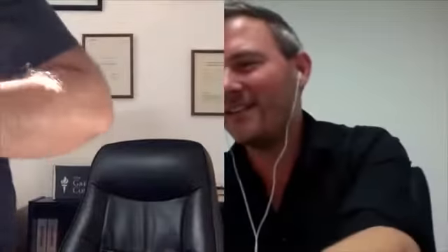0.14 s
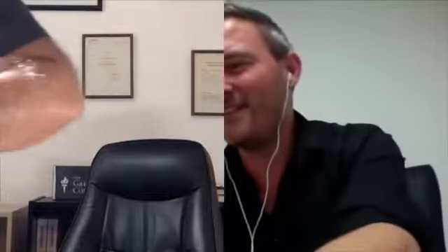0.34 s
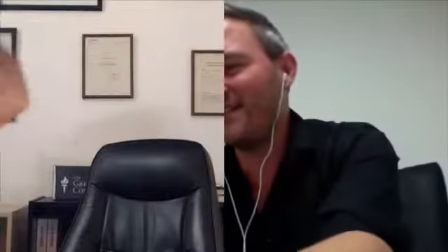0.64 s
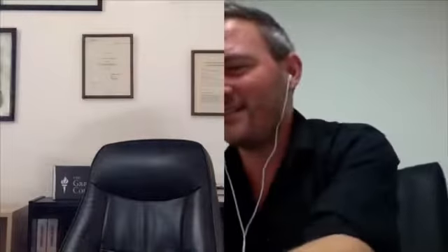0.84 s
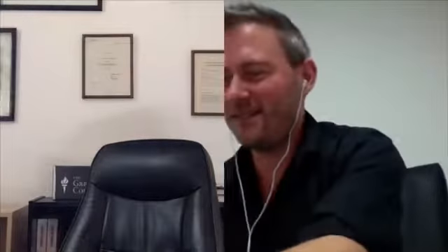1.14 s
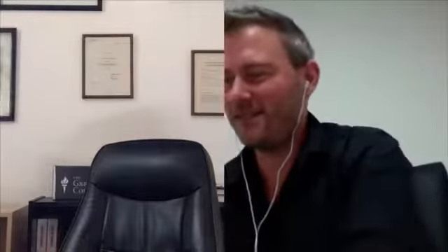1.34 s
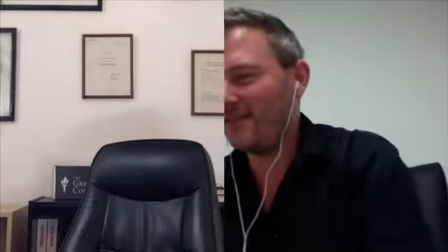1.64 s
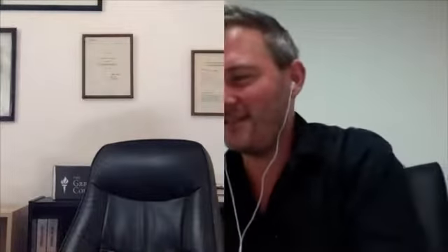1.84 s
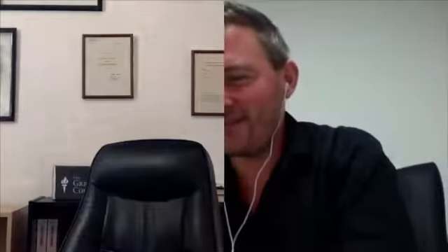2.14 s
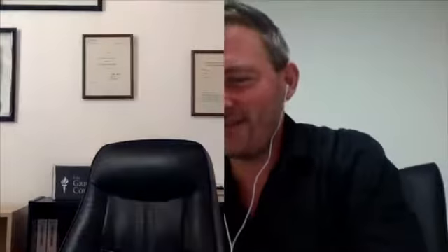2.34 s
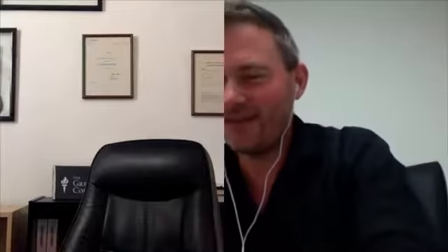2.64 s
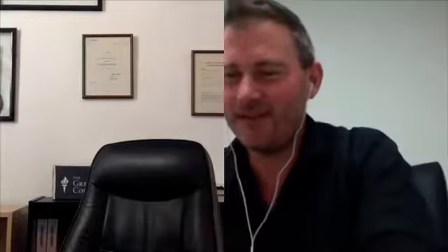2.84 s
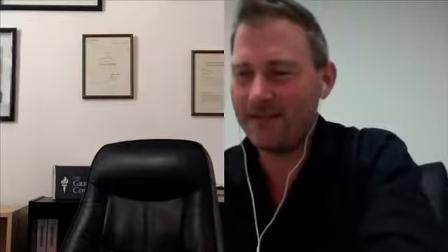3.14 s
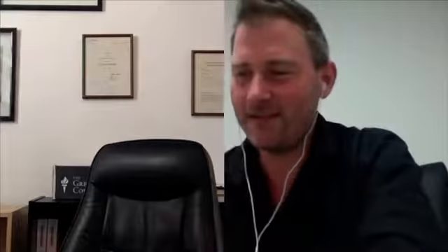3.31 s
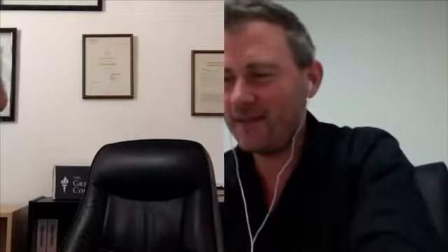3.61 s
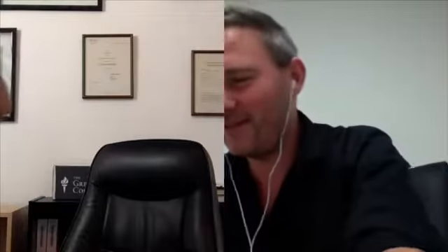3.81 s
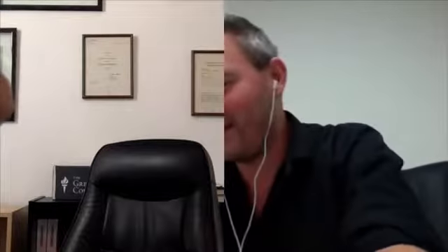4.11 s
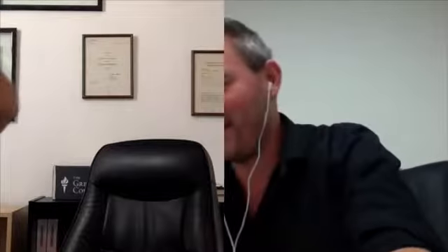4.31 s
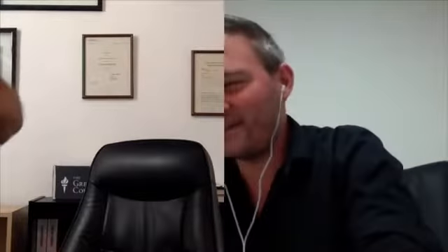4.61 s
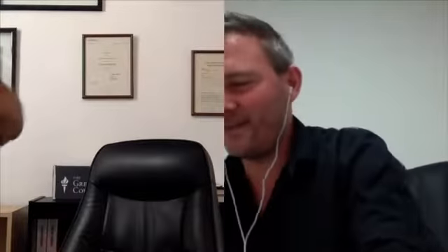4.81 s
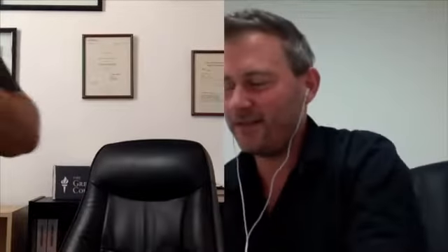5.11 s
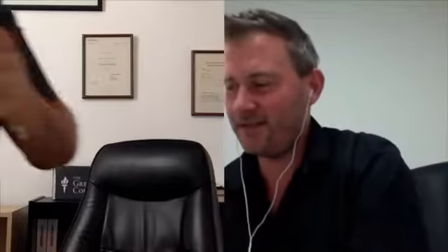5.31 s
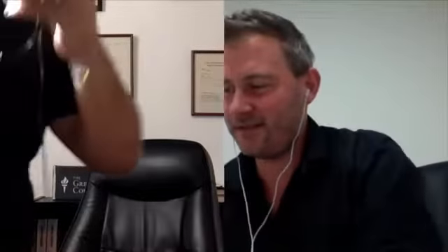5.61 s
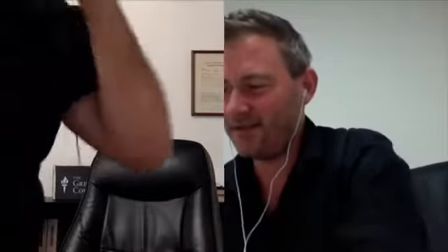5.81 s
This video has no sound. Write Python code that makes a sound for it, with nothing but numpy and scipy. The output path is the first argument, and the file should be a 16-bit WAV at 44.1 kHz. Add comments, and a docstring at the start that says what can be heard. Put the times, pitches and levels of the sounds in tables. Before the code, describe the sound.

Thin blind slats knock, scrape and snap close by while cords hiss and the rail bumps dully. A first burst peaks near one second; single clacks and a ringing snap follow with pauses between; then a busier, longer rattle fills the time around four to five seconds before small ticks close. Small room, faint low hum, thin bass and suppressed tails of a video-call microphone.

```python
"""A window blind is worked in bursts in a small office: its thin slats rustle, rattle and snap, made by
resonances that are rubbed with noise or struck with blows. Sliding cords hiss as shaped noise, the bottom rail
thuds on the sill as a low resonance, and scrapes squeak as gliding resonances. Sharp snaps leave a shimmer in
the head rail. The room adds a decaying tail; a faint hum and room air stay underneath."""
import sys
import numpy as np
from scipy import signal
from scipy.fft import rfft, irfft, next_fast_len
from scipy.io import wavfile
from scipy.ndimage import uniform_filter1d, map_coordinates

SR = 44100
rng = np.random.default_rng(int(sys.argv[2]) if len(sys.argv) > 2 else 0)


def bounce(signal):
    """Save signal as a 16-bit WAV file at the path given by the first command-line argument."""
    frames = np.transpose(np.atleast_2d(signal))
    limited = np.clip(frames, -1, 1)
    pcm = np.round(limited * 32767).astype(np.int16)
    wavfile.write(sys.argv[1], SR, pcm)


def level_to_linear(level):
    """Convert decibel levels to linear amplitude factors, elementwise."""
    exponent = np.asarray(level, float) / 20
    return 10 ** exponent


N = 262878

# Resonances of the rail and of a slat's dull knock, clack and bright snap.
# Each row: centre in Hz, nominal width in Hz before broadening, level in dB before tilt and scatter.
RAIL_MODES = [(2600, 170, -5), (2960, 130, 0), (3450, 300, -20)]
KNOCK_MODES = [(520, 170, -5), (770, 170, 0), (980, 220, -2)]
CLACK_MODES = [(1400, 220, -3), (1800, 200, 0), (2200, 280, -3)]
SNAP_MODES = [(4600, 1100, -3), (5800, 1000, 2), (8500, 3000, -4), (14000, 4000, -7)]


def unit(x):
    """Normalisation of power: scales a signal to rms 1."""
    return x / np.sqrt(np.mean(x ** 2) + 1e-20)


def along(points, hz):
    """Logarithmic frequency scale: interpolates (Hz, value) points on it."""
    f, v = np.transpose(points)
    return np.interp(np.log(hz + 1), np.log(f + 1), v)


def curves(rows):
    """Linear interpolation in time: one value per sample for each column after the time."""
    s, *cols = np.transpose(rows)
    return [np.interp(np.arange(N) / SR, s, c) for c in cols]


def wobble(rate):
    """Slow random modulation: a smooth curve through random knots, rate knots a second."""
    knots = rng.standard_normal(int(N * 400 / SR) + 4)
    return map_coordinates(knots, [np.arange(N) * rate / SR])


def filtered(x, response):
    """Linear filtering: the spectrum of x times a complex response of frequency."""
    m = next_fast_len(len(x) + 8192)
    return irfft(rfft(x, m) * response(np.fft.rfftfreq(m, 1 / SR)), m)[:len(x)]


def modes(table):
    """Modal superposition: causal resonances with steep skirts, scaled so that a unit blow peaks at 1."""
    def resonance(f, centre, width):
        return (1j * f * width / (centre * centre - f * f + 1j * f * width)) ** 2

    def raw(f):
        # neighbouring modes have opposite signs
        return sum((-1) ** k * level_to_linear(db) * resonance(f, centre, 1.5 * width)
                   for k, (centre, width, db) in enumerate(table))

    peak = np.abs(irfft(raw(np.fft.rfftfreq(8192, 1 / SR)))).max()
    return lambda f: raw(f) / peak


def friction(spectrum, grain_db, ticks, tick_size):
    """Stick-slip friction: noise in uneven lumps with sparse tiny ticks (per s), coloured, rms 1."""
    lumps = level_to_linear(grain_db * (wobble(30) + wobble(140)))
    slips = (rng.random(N) < ticks / SR) * rng.laplace(size=N) * tick_size
    colour = [(23.4, -120)] + spectrum
    return unit(filtered(lumps * rng.standard_normal(N) + slips, lambda hz: level_to_linear(along(colour, hz))))


def scraping(part, grain_db, swell_db, broad_hz):
    """Friction-driven resonance: each mode of a part rings in its own swells, over a broad band."""
    # Spectrum of the rubbing. Each row: frequency in Hz, relative density in dB per Hz.
    scrape_spectrum = [(250, -12.5), (400, -7.5), (700, -12.5), (4000, 1.5), (6000, 2.5), (9000, -10)]
    middle = [(part[1][0], broad_hz, 0)]
    out = 2.7 * unit(filtered(friction(scrape_spectrum, grain_db, 150, 4), modes(middle)))
    for mode in part:
        rub = level_to_linear(swell_db * wobble(19)) * friction(scrape_spectrum, grain_db, 110, 5.2)
        out = out + 1.3 * level_to_linear(mode[2]) * unit(filtered(rub, modes([mode])))
    return unit(out)


def clattering():
    """Random impact process: chance clacks, each a few ms of touches into one slat or rail mode."""
    out = np.zeros(N)
    for mode in KNOCK_MODES[1:] + CLACK_MODES + RAIL_MODES[:2] + SNAP_MODES[:1]:
        # 150 clacks a second on average, shared by the eight modes
        starts = (rng.random(N) < 150 / 8 / SR) * rng.uniform(.3, 1.2, N)
        fading = signal.lfilter([1], [1, -.99], starts)
        touches = fading * rng.standard_normal(N) * (rng.random(N) < .05)
        out += filtered(starts + touches, modes([(mode[0], 1.5 * mode[1], 0)]))
    return out


def rustle():
    """Sliding friction: slats brush each other, scrape along the rail, and the cords hiss through them."""
    # Slats rubbing each other and the rail.
    # Each row: time in seconds, rustle level in dB, clack level in dB, rail level in dB.
    brush = [(0, -55, -86, -73), (.1, -53, -81, -79), (.21, -65, -77.5, -80), (.31, -67, -54.5, -58.5),
             (.42, -54.5, -57, -58.5), (.51, -43.5, -48.5, -64.5), (.53, -52, -41.5, -48),
             (.58, -88, -43, -68), (.63, -100, -52.5, -78), (.7, -110, -70, -110), (.8, -78, -79, -58.5),
             (.85, -60, -44.5, -39.5), (.9, -51, -43, -48.5), (.99, -36.5, -42.5, -30),
             (1.05, -47.5, -44, -62.5), (1.14, -59.5, -55, -87.5), (1.23, -66, -99, -99),
             (1.6, -82.5, -83.5, -99), (1.74, -71, -68.5, -63.5), (1.98, -65, -73.5, -89),
             (2.12, -63.5, -54, -52.5), (2.36, -76, -60.5, -51.5), (2.61, -64, -57, -54),
             (2.75, -73.5, -63.5, -65), (2.87, -96.5, -86, -75), (3.23, -106, -80.5, -81),
             (3.36, -57, -56.5, -54), (3.43, -56.5, -64, -81), (3.49, -65.5, -54.5, -69),
             (3.55, -46, -72, -72), (3.58, -76, -92, -97), (3.63, -63, -92, -86), (3.72, -66, -95, -90),
             (3.8, -46.5, -50.5, -62), (3.87, -55, -41, -59), (4.0, -40.5, -40, -49.5),
             (4.1, -44, -39.5, -43.5), (4.19, -41.5, -42, -41.5), (4.27, -46, -43, -54.5),
             (4.4, -36.5, -37.5, -90), (4.52, -58.5, -67, -59), (4.62, -50, -34.5, -49),
             (4.7, -50.5, -40.5, -42), (4.75, -38.5, -40, -36.5), (4.8, -43.5, -40, -40.5),
             (4.86, -51, -49.5, -43.5), (4.96, -53, -70, -67.5), (5.08, -67.5, -59.5, -80),
             (5.22, -61.5, -60.5, -72), (5.36, -74, -79.5, -75), (5.41, -57, -70, -80.5),
             (5.47, -54, -61, -77.5), (5.61, -60, -65, -73), (5.69, -66.5, -64, -84),
             (5.74, -69, -64.5, -76), (5.84, -67, -62.5, -88), (5.96, -84, -79.5, -87)]
    # Spectra of the low rumble, the cord hiss and its top sizzle.
    # Each row: frequency in Hz, relative density in dB per Hz.
    rumble_spectrum = [(100, -24.5), (140, -7), (200, -4), (300, -2), (420, 0), (600, -61)]
    hiss_spectrum = [(2060, -29), (3500, -3), (4460, 6.5), (6400, 7.5), (8530, 4.5), (10200, 3),
                     (15100, -9.5), (16000, -50)]
    sizzle_spectrum = [(9000, -29.5), (11500, -12), (13000, 4), (15300, -1), (16000, -27)]
    slat_db, clack_db, rail_db = curves(brush)
    cord_db = pulling()
    # the rumble follows a share of the rustle's swing, -66.5 dB at a rustle of -57 dB
    body_db = -66.5 + 0.42 * (slat_db + 57)
    slats = level_to_linear(slat_db) * scraping(KNOCK_MODES, grain_db=3.5, swell_db=1.5, broad_hz=770)
    body = level_to_linear(body_db) * friction(rumble_spectrum, grain_db=1.8, ticks=30, tick_size=5)
    clack = level_to_linear(clack_db) * scraping(CLACK_MODES, grain_db=1.5, swell_db=0.5, broad_hz=1100)
    rail = level_to_linear(rail_db) * scraping(RAIL_MODES, grain_db=1.5, swell_db=4.5, broad_hz=1750)
    cords = level_to_linear(cord_db) * friction(hiss_spectrum, grain_db=1.2, ticks=400, tick_size=2)
    sizzle = level_to_linear(cord_db - 6) * friction(sizzle_spectrum, grain_db=0, ticks=100, tick_size=3.3)
    clatter = level_to_linear(clack_db + 1) * clattering()
    return clatter + slats + body + clack + rail + cords + sizzle


def quiet():
    """Stationary background: room air as shaped noise and an electrical hum of wavering level and pitch."""
    # Spectrum of the room air. Each row: frequency in Hz, relative density in dB per Hz.
    air_spectrum = [(15, -39.5), (25, -2.5), (84, -8), (102, -3.5), (123, -1), (149, -9), (180, -8),
                    (293, -7), (326, -14), (624, -14), (4740, -24.5), (5880, -23.5), (10000, -24.5),
                    (13000, -33), (16000, -29.5)]
    # Hum before its waver. Each row: time in seconds, level in dB.
    hum_level = [(0, -85), (.3, -73), (1.3, -68), (2.5, -75), (2.7, -91.5), (3.25, -85.5), (3.35, -70),
                 (4.5, -64.5), (5.7, -71), (5.96, -87)]
    air = level_to_linear(-71) * unit(filtered(rng.standard_normal(N), lambda hz: level_to_linear(along(air_spectrum, hz))))
    hum_db, = curves(hum_level)
    level = level_to_linear(hum_db + 1.5 * wobble(9))
    hum_hz = 120 + 3 * wobble(12)
    return air + level * np.sin(2 * np.pi * np.cumsum(hum_hz) / SR)


def thuds():
    """Impulse response of low modes: a push and a brief shudder excite the rail and the sill below it."""
    # The rail on the sill. Each row: start in seconds, level in dB, resonance in Hz.
    bumps = [(0.041, -39.5, 410), (0.397, -49.5, 396), (0.53, -32, 273), (0.867, -29.5, 434),
             (0.981, -29, 238.5), (0.458, -43.5, 295), (.585, -33.5, 384), (1.04, -47, 106.6),
             (1.112, -35, 400), (1.236, -40, 297), (1.968, -40.5, 440), (2.625, -54, 383),
             (4.384, -35, 349), (4.8771, -28.5, 200), (4.889, -35.5, 196), (5.602, -48, 357),
             (5.762, -27, 478)]
    out, t = np.zeros(N + SR), np.arange(SR // 5) / SR
    for s, db, hz in bumps:
        shudder = .03 * rng.standard_normal(len(t)) * np.exp(-t / .012)
        shudder[0] = 0.76  # the push
        sill = [(135, 70, -9), (200, 90, 2), (hz, 0.42 * hz, 2)]
        out[round(s * SR):][:len(t)] += level_to_linear(db) * filtered(shudder, modes(sill))
    return out[:N]


def office(x):
    """Reverberation: a new random tail for each short stretch; each frequency dies at its own speed."""
    # Decay of the room. Each row: frequency in Hz, time to fall by 60 dB in seconds.
    decay = [(150, 0.31), (600, 0.23), (3000, 0.16), (6000, 0.215), (12000, 0.1275)]
    step, out = SR // 8, np.zeros(N + SR)
    for start in range(0, N, step):
        hz, t, z = signal.stft(rng.standard_normal(SR // 2), SR, nperseg=256)
        tail = signal.istft(z * level_to_linear(-60 * t / along(decay, hz)[:, None]), SR, nperseg=256)[1]
        wet = signal.fftconvolve(x[start:start + step], tail / np.linalg.norm(tail))
        out[start + 300:][:len(wet)] += wet  # the first wall answers after 7 ms
    return out[:N]


def contacts():
    """Impact excitation: a first blow and a rattle of rebounds ring the slat and the rail, then stop."""
    # Rattling contacts, and clean taps that hardly rebound. Each row: start in seconds, slat level in dB,
    # hardness (0 dull knock, 1 clack, 2 bright snap; no unit), rail ring level in dB.
    rattling = [(0.1115, -37, 22, -65), (0.239, -36, 1.03, -51), (0.3717, -43, 0.5, -34.5),
                (0.388, -42, -0.3, -40.5), (0.4467, -51.5, -1.2, -30), (0.5245, -28, -2, -33),
                (0.5761, -40.5, 0, -39.5), (0.858, -36.5, 1.5, -32.5), (0.8685, -18, 1.5, -43.5),
                (0.949, -14.5, 1.5, -15), (0.9615, -29.5, 1, -29), (0.9818, -13.5, 3.5, -33.5),
                (0.9867, -28.5, 0.5, -56), (1.114, -32.5, -2, -23), (1.623, -48.5, -1, -40),
                (1.6967, -47, 1.5, -68), (1.965, -32, 0, -17), (2.16, -35, 1.8, -40), (2.574, -40, 1, -63),
                (3.165, -48.5, 0.3, -52), (3.273, -38, 3.5, -60), (3.4524, -40, 0, -55),
                (3.455, -39, 5, -66), (3.475, -45, 0.2, -42), (3.5349, -38, 5, -60), (3.543, -44, 1.3, -64),
                (3.642, -39.5, 1.05, -47), (3.7593, -37, 1, -28.5), (3.825, -23.5, 1.5, -34),
                (3.8461, -28.5, 0.84, -70), (3.9362, -34.5, 0, -40.5), (3.9771, -37, -6, -19),
                (4.035, -29.5, 5, -54), (4.2104, -26.5, 6, -44), (4.3289, -20.5, 2.4, -33),
                (4.3392, -19, 1.2, -36), (4.3746, -34.5, 3.3, -36.5), (4.3904, -34, 1.2, -58),
                (4.62, -22.5, 3, -43), (4.631, -24, 2.1, -42), (4.731, -28, 3.5, -56), (4.785, -36, 6, -46),
                (5.01, -47, 2.5, -81), (5.0692, -43, -1, -64), (5.1985, -56, 0.5, -49.5),
                (5.459, -55, .6, -67), (5.506, -42.5, 8, -58), (5.5743, -50, 1, -47.5),
                (5.6545, -55, 1, -54), (5.812, -57, -0.1, -71)]
    clean_taps = [(.2275, -21, 1.72, -46.5), (2.55, -47, 1, -48), (3.335, -37, 1.1, -36),
                  (4.562, -24, 1.6, -44), (4.5843, -23, 1.8, -35), (4.874, -28, 1.6, -39),
                  (5.796, -35, 0.87, -46)]
    # Thin bright ticks. Each row: start in seconds, level in dB.
    thin_ticks = [(0.1112, -36), (1.6998, -28.5), (3.5036, -40), (5.0112, -42), (5.061, -45.5),
                  (5.073, -35.5), (5.404, -47.5), (5.429, -41.5), (5.46, -37), (5.512, -39)]
    t, out = np.arange(SR // 8) / SR, np.zeros(N + SR)
    # rows and entries of four: knock, clack, snap, rail
    parts = (KNOCK_MODES, CLACK_MODES, SNAP_MODES, RAIL_MODES)
    tilts = (0, 0, -6, 0)  # dB per octave over the modes
    rebound = np.array([[.7], [.7], [.9], [.4]])
    lasting = 0.0084 * np.array([[1], [1], [.6], [.9]])  # s; the snap stops first
    fade = np.exp(-(t / lasting) ** 2) * (1 - np.exp(-t / 0.0039))
    # a tap's rebounds are 0.22 of a rattling contact's
    events = [(*c, 1) for c in rattling] + [(*c, 0.22) for c in clean_taps]
    for s, slat_db, hard, rail_db, loose in events:
        off = np.array([max(hard, 0), hard - 1, min(hard - 2, 0)])
        part_db = np.append(slat_db - 8 * off ** 2, rail_db)  # 8 dB lost one hardness step away
        touches = rng.standard_normal((4, len(t))) * (rng.random(len(t)) < .09)
        rattle = touches * rebound * fade * loose
        rattle[:, 0] = [0.68, 0.29, 0.33, 0.1]  # the first blow
        # no two slats have quite the same pitch
        pitches = np.exp(rng.standard_normal(4) * [.08, .06, .02, .01])
        for blows, db, part, pitch, tilt in zip(rattle, part_db, parts, pitches, tilts):
            ring = [(hz * pitch, width, level + tilt * np.log2(hz) + rng.normal(0, 2))
                    for hz, width, level in part]
            out[round(s * SR):][:len(t)] += level_to_linear(db) * filtered(blows, modes(ring))
    # ticks ring the snap modes, tilted up by 3 dB per octave
    thin = modes([(hz, width, level + 3 * np.log2(hz)) for hz, width, level in SNAP_MODES])
    for s, db in thin_ticks:
        blows = rng.standard_normal(len(t)) * (rng.random(len(t)) < .05) * fade[2]
        blows[0] = 1
        out[round(s * SR):][:len(t)] += level_to_linear(db) * filtered(blows, thin)
    return out[:N]


def cracks():
    """Heavily damped resonance: a spiky, decaying burst of noise sounds one broad band as a dry clack."""
    # Clacks without a clear ring. Each row: start in seconds, level in dB before the make-up gain,
    # centre in Hz, time for the burst to fall by 60 dB in seconds.
    dry_clacks = [(0.228, -39.5, 3280, 0.015), (0.238, -40.5, 3470, 0.26), (.868, -24, 2023, 0.03),
                  (1.108, -31.5, 3434, 0.022), (1.114, -25, 1860, 0.016), (1.126, -37.5, 1450, 0.079),
                  (1.154, -36.5, 1730, 0.032), (1.812, -57.5, 6000, .1), (1.666, -61, 2990, 0.019),
                  (1.697, -51, 4130, 0.48), (1.955, -26, 2170, 0.055), (1.963, -22.5, 2410, 0.047),
                  (2.625, -34, 3380, 0.025), (2.635, -39, 5570, 0.41), (3.166, -46, 3130, 0.12),
                  (3.276, -39.5, 4670, 0.065), (3.406, -45, 790, 0.016), (3.494, -52, 2500, 0.022),
                  (3.549, -37.5, 5900, 0.011), (3.693, -56.5, 5240, 0.12), (3.749, -46, 5300, 0.016),
                  (3.94, -35, 2180, 0.087), (4.143, -48, 2120, 0.08), (4.403, -30, 1930, 0.059),
                  (3.978, -33.5, 2360, 0.018), (4.331, -26, 2850, 0.042), (4.341, -24, 2040, .05),
                  (4.882, -35, 500, 0.03), (5.173, -65, 3180, .06), (5.815, -47, 1500, 0.061),
                  (5.061, -56, 3600, 0.096)]
    out, t = np.zeros(N + SR), np.arange(SR // 5) / SR
    for s, db, hz, t60 in dry_clacks:
        burst = rng.laplace(size=len(t)) * level_to_linear(-60 * t / t60)
        width = 1.45 * hz

        def body(f):
            band = (1j * f * width / (hz * hz - f * f + 1j * f * width)) ** 2
            return band / (1 + 1j * f / (2.1 * hz)) ** 4  # steep treble loss

        make_up = level_to_linear(12) * np.sqrt(2000 / hz)  # more for low, narrow bands
        out[round(s * SR):][:len(t)] += level_to_linear(db) * make_up * filtered(burst, body)
    return out[:N]


def squeaks():
    """Stick-slip oscillation: uneven slips ring one gliding resonance, which dies when the slat lifts."""
    # Squeaky scrapes. Each row: start in seconds, length in seconds, first pitch in Hz, last pitch in Hz,
    # level in dB.
    scrapes = [(0.373, 0.044, 2600, 2440, -45), (0.387, 0.071, 3000, 2950, -50.5),
               (0.391, 0.037, 442, 390, -46.5), (0.444, 0.026, 1660, 1650, -48),
               (0.527, 0.022, 683, 690, -32.5), (0.521, 0.011, 2180, 2170, -40.5),
               (0.555, 0.045, 1616, 1680, -43.5), (0.536, 0.054, 2950, 2900, -42.5),
               (0.543, 0.057, 2620, 2650, -47.5), (0.588, 0.073, 1968, 1845, -50.5),
               (0.949, 0.012, 2900, 2933, -18), (0.955, 0.014, 2980, 3040, -25),
               (0.88, 0.033, 1686, 1810, -49), (1.569, 0.016, 2200, 2110, -62.5),
               (1.623, 0.022, 814, 805, -49.5), (1.625, 0.0071, 2665, 2670, -46),
               (1.692, 0.045, 1935, 1880, -53.5), (3.639, 0.018, 2975, 2850, -41.5),
               (1.993, 0.077, 1750, 1910, -52), (2.2, 0.083, 2390, 2835, -57),
               (2.297, 0.13, 2970, 3450, -59), (2.286, 0.065, 1070, 1040, -63),
               (2.331, 0.16, 2560, 2950, -71), (2.468, 0.18, 3070, 3690, -52.5),
               (2.622, 0.037, 352, 367, -57), (3.359, 0.014, 2070, 2015, -54),
               (3.452, 0.037, 735, 784, -52), (3.497, 0.02, 1760, 1740, -50),
               (3.504, 0.0057, 3600, 3800, -51.5), (3.549, 0.069, 753, 515, -56),
               (3.644, 0.013, 1713, 1637, -42), (3.667, 0.012, 3020, 2860, -40),
               (3.668, 0.013, 1370, 1320, -47), (3.755, 0.069, 2590, 2620, -48),
               (3.825, .012, 1810, 1710, -47), (3.826, 0.054, 793, 911, -36.5),
               (3.885, 0.041, 892, 850, -40.5), (3.982, 0.023, 3047, 2840, -33),
               (4.028, 0.098, 848, 790, -40), (4.201, 0.021, 2440, 2500, -40),
               (4.287, .035, 2040, 2275, -41.5), (4.553, 0.077, 750, 651, -46.5),
               (4.561, 0.018, 2465, 2670, -44), (4.675, 0.036, 5500, 5600, -42),
               (4.655, 0.039, 2180, 2280, -46), (5.401, 0.053, 1196, 1010, -57.5),
               (5.457, .025, 1170, 1110, -58), (5.501, 0.059, 1990, 1920, -52.5),
               (5.57, 0.042, 2940, 2980, -67), (5.657, 0.038, 2800, 3110, -61.5),
               (5.68, 0.013, 1780, 1760, -55.5), (5.778, 0.04, 484, 466, -53),
               (5.821, 0.017, 464, 475, -54.5)]
    width_hz, rise_s, fall_s = 113, 0.002, 0.003
    out, t = np.zeros(N + SR), np.arange(SR // 4) / SR
    for s, length, from_hz, to_hz, db in scrapes:
        # two slow noises on a sine and a cosine make a narrow band around the pitch
        slips = [unit(filtered(v, lambda f: 1 / (1 + (f / width_hz) ** 2)))
                 for v in rng.standard_normal((2, len(t)))]
        turn = 2 * np.pi * np.cumsum(np.interp(t, [0, length], [from_hz, to_hz])) / SR
        stroke = (1 - np.exp(-t / rise_s)) * np.exp(-np.maximum(t - length, 0) / fall_s)
        squeal = slips[0] * np.sin(turn) + slips[1] * np.cos(turn)
        out[round(s * SR):][:len(t)] += level_to_linear(db) * stroke * squeal
    return out[:N]


def pulling():
    """Friction noise grows with speed: hiss level in dB as each cord pull fades in, swells and stops."""
    # Cord pulls. Each row: under way at in seconds, stopped at in seconds, level at the stop in dB,
    # fade-in in dB per second, fade-out in dB per second.
    pulls = [(0.606, 0.951, -44, 91, 189.5), (1.0, 1.095, -53.5, 200, 401), (2.09, 2.72, -42.5, 115, 386.5),
             (3.858, 3.982, -52, 250, 100), (4.045, 4.214, -41, 200, 403), (4.596, 4.706, -43.5, 313, 199),
             (4.733, 4.788, -37.5, 397.5, 263)]
    t, levels = np.arange(N) / SR, []
    for begin, end, db, rise_db, fall_db in pulls:
        swell_db = 13.5 * min(2 * (end - begin), 1)  # less in pulls under half a second
        swell = swell_db * np.clip((end - t) / (end - begin), 0, 1)
        before = rise_db * np.maximum(begin - t, 0)
        after = fall_db * np.maximum(t - end, 0)
        levels.append(db - swell - before - after)
    return np.max(levels, axis=0)


def pings():
    """Impulse response of a single mode: one blow and a quick second touch snap one slat edge."""
    # Short pitched snaps. Each row: start in seconds, level in dB, pitch in Hz.
    edge_snaps = [(2.6259, -15, 5660), (2.6306, -13.5, 6300), (2.648, -29, 5630), (2.71, -25, 5600),
                  (3.275, -26.5, 5530), (4.382, -16.5, 1850), (4.5843, -22.5, 1530), (5.016, -48, 1700),
                  (5.404, -43, 5000), (5.426, -41, 5100), (5.46, -41, 5060), (5.512, -36.5, 5000)]
    out = np.zeros(N + SR)
    for s, db, hz in edge_snaps:
        blows = np.zeros(2048)
        blows[[0, 40]] = 1, rng.uniform(.3, .7)  # the second comes 0.9 ms later
        out[round(s * SR):][:len(blows)] += level_to_linear(db) * filtered(blows, modes([(hz, 1200, 0)]))
    return out[:N]


def head_rail():
    """High modal density: some sharp snaps leave a narrow, slowly dying shimmer in the hollow rail."""
    # Dense high modes, in one row: centre in Hz, half width in Hz, time to fall by 60 dB in seconds.
    shimmer = (5710, 670, 0.52)
    # Snaps that reach the head rail. Each row: start in seconds, shimmer level in dB.
    head_blows = [(2.629, 0), (3.167, -20.5), (3.273, -15)]
    hz, width, t60 = shimmer
    t, out = np.arange(SR // 2) / SR, np.zeros(N + SR)
    for s, db in head_blows:
        band = filtered(rng.standard_normal(len(t)), lambda f: 1 / (1 + ((f - hz) / width) ** 4))
        tail = band * level_to_linear(-60 * t / t60)
        out[round(s * SR):][:len(t)] += level_to_linear(db) * tail / np.linalg.norm(tail)
    return out[:N]


def scene():
    """Superposition: hits and squeaks with their room tail over the rubbing and the quiet."""
    clatter, bumps, squeal = contacts() + cracks() + pings(), thuds(), squeaks()
    room = level_to_linear(-4) * office(clatter + 0.78 * bumps + 0.13 * squeal)
    return (clatter + head_rail() + bumps + squeal + room + rustle() + quiet())[None]


def suppress(x, depth, floor_db):
    """Spectral subtraction: call software turns a band down as it falls below its recent past, cutting tails."""
    z = signal.stft(x, nperseg=512)[2]
    power = uniform_filter1d(np.abs(z) ** 2, size=15, axis=0)
    past = signal.lfilter([0, 0, 0, 0, .12], [1, -.88], power, axis=1)
    gain = np.clip(1 - depth * past / (power + 1e-20), level_to_linear(2 * floor_db), 1) ** .5
    return signal.istft(z * uniform_filter1d(gain, size=3, axis=1), nperseg=512)[1][:N]


def roll_off(x):
    """The treble ends steeply here."""
    return signal.sosfilt(signal.butter(12, 16000, fs=SR, output="sos"), x)


def record(dry):
    """Band limiting: a call microphone without deep bass, tail suppression, a top treble that comes and goes."""
    # Stretches in which the top treble is heard. Each row: start in seconds, end in seconds.
    bright = [(0, .19), (1.68, 3.62), (4.98, 5.96)]
    x = filtered(dry[0], lambda hz: (1j * hz / (1j * hz + 60)) ** 2)
    x = suppress(x, depth=0.21, floor_db=-3.5)
    top = filtered(x, lambda hz: hz > 11650)
    t = np.arange(N) / SR
    shut = 1 - sum((t >= a) & (t < b) for a, b in bright)
    mix = x - uniform_filter1d(shut * 1., size=441) * top  # 10 ms crossings
    return roll_off(mix[None])


dry = scene()
out = record(dry)
bounce(out)
```